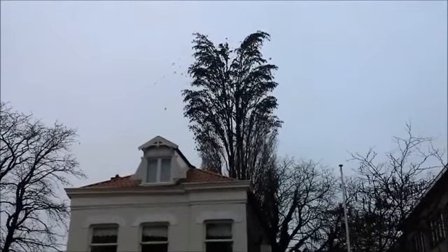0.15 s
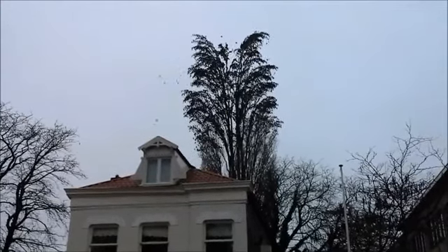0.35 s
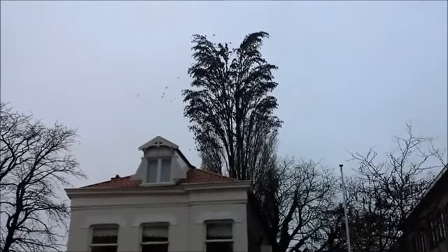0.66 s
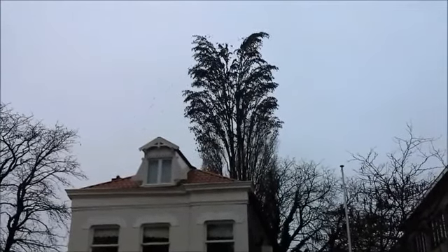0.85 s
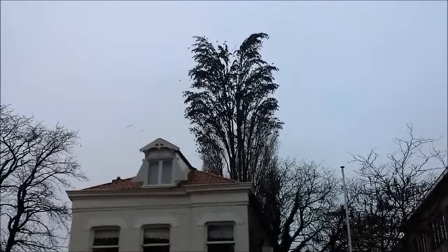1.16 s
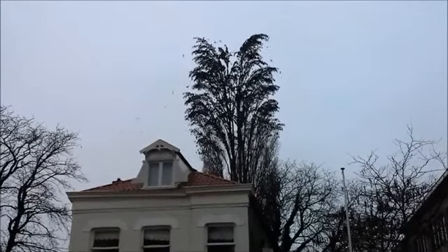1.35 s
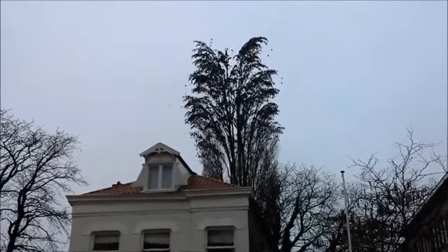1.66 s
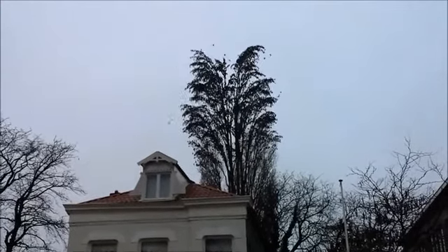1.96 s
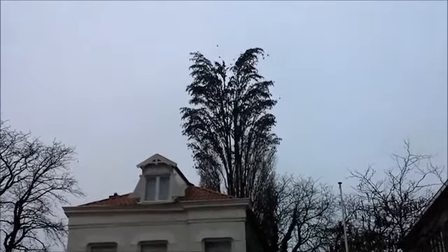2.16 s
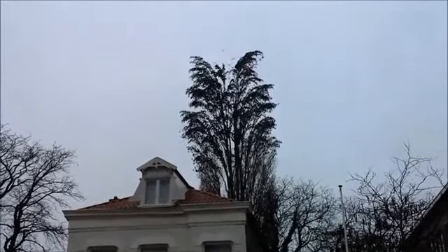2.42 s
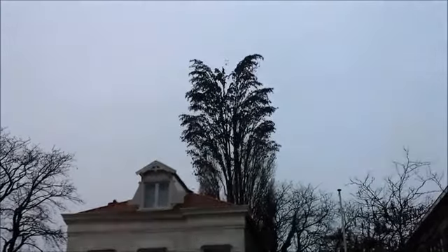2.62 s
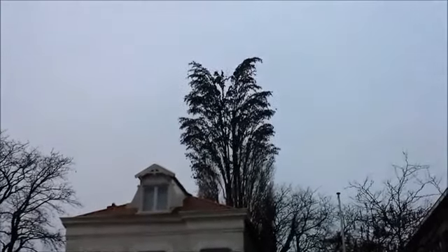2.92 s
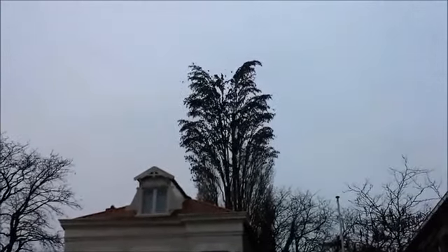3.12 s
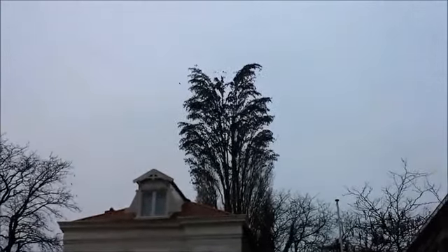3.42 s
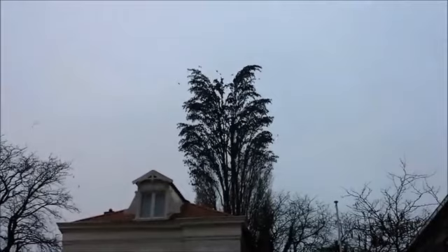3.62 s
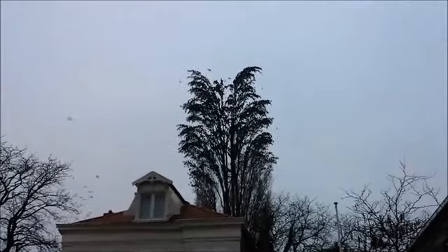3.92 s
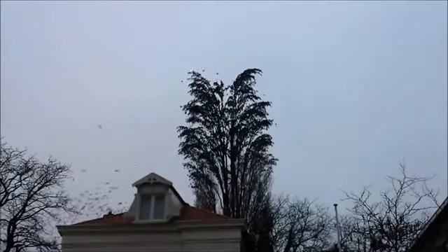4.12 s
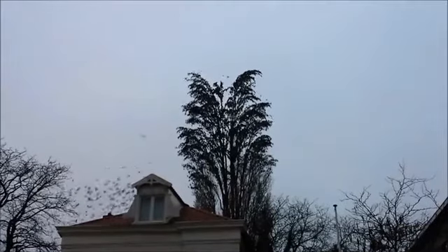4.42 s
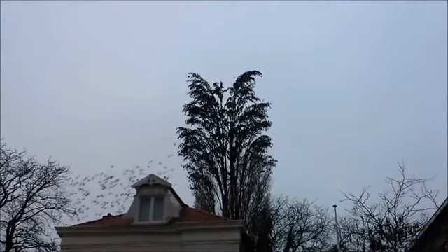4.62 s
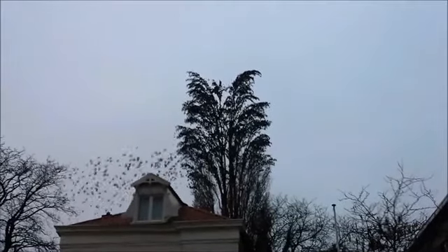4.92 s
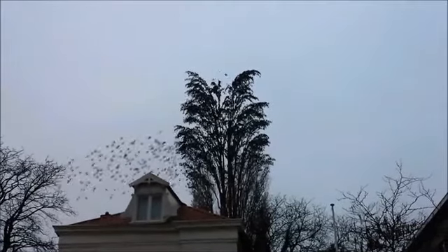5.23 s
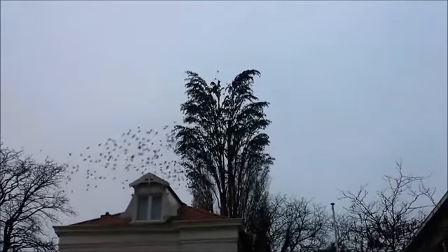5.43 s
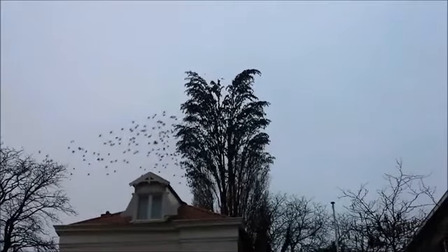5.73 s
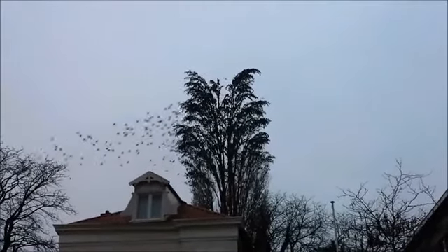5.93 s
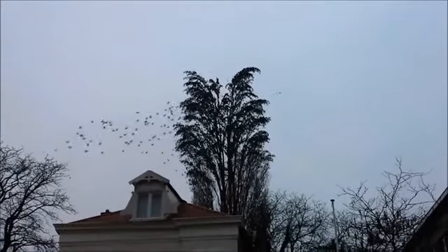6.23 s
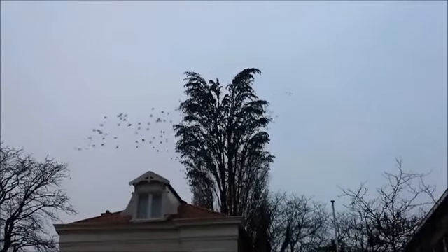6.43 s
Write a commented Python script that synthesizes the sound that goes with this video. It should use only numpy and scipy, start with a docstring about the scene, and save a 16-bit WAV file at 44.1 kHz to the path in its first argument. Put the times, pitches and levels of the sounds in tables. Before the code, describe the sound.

A huge flock of starlings squeaks and chatters shrilly in a tall tree, with a few nearer whistles over faint town rumble.

```python
"""A shrill wash of starlings, swelling and sinking: a huge roost in a tall tree, heard from the street.
Squeaks and warbles are gliding near-sines from the syrinx; rasps are uneven pulses ringing the throat.
A few nearer birds cut through with whistles and squeals, and branches and walls scatter the calls.
Behind them sit the hiss of birds deep in the trees, town rumble with drifting engine notes,
one far vehicle going by and a single dull knock."""
import sys
import numpy as np
from scipy import signal
from scipy.fft import rfft, irfft, next_fast_len
from scipy.io import wavfile

SR = 44100
rng = np.random.default_rng(int(sys.argv[2]) if len(sys.argv) > 2 else 0)


def unload_audio(sound):
    """Save the sound as a 16-bit wav file, at the path given as the first command line argument."""
    columns = np.transpose(np.atleast_2d(sound))
    # keep every value between -1 and 1, then stretch to whole-number steps
    steps = np.round(np.clip(columns, -1, 1) * 32767)
    wavfile.write(sys.argv[1], SR, steps.astype(np.int16))


N = 289737
T = np.arange(N) / SR


def flock():
    """The crowd in the tree: hundreds of overlapping calls fuse into shrill, harsh and low layers."""
    rise_db = flurries()
    shrill_gain, harsh_gain = undb(-29 + rise_db), undb(-33 + 0.19 * rise_db)
    squeaks = level(chorus(squeak, hz=6900, spread=0.052, length_s=0.06, count=500), -1.7)
    sizzle = level(chorus(buzz, hz=7020, spread=0.07, length_s=0.1, count=120), -7)
    pipes = level(chorus(pipe, hz=8450, spread=0.035, length_s=0.08, count=120), -40.5)
    rasps = level(chorus(buzz, hz=5220, spread=0.098, length_s=0.09, count=150), -5)
    chirps = level(chorus(warble, hz=5100, spread=0.085, length_s=0.03, count=340), -3)
    warbles = level(chorus(warble, hz=2280, spread=0.085, length_s=0.05, count=360), -43)
    chatter = level(chorus(buzz, hz=2890, spread=0.18, length_s=0.1, count=130), -44)
    shrill = scatter((squeaks + sizzle) * shrill_gain + pipes, wet_db=3.5, t60_s=0.23)
    harsh = scatter((rasps + chirps) * harsh_gain, wet_db=1, t60_s=0.16)
    low = scatter(warbles + chatter, wet_db=1, t60_s=0.5)
    return shrill + harsh + low


def flurries(attack_s=0.1, release_s=0.17):
    """Level ride in dB as squeaking spreads through the crowd: birds join in, keep on, drop out."""
    # surges of excitement: start_s, length_s, rise_db
    surges = [ (0.14, 0.44, 4.5), (0.73, 0.61, 5), (2.258, 0.4, 5), (2.82, 0.6, 6.5), (3.463, 0.61, 5),
              (4.08, 0.5, 5), (4.658, 0.53, 3.5), (5.237, 0.37, 5.5), (5.85, 0.61, 2.5)]
    rise_db = np.zeros(N)
    for start, length, db in surges:
        ramp = np.minimum((T - start) / attack_s, (start + length - T) / release_s)
        rise_db += db * np.clip(ramp, 0, 1)
    return rise_db


def chorus(voice, hz, spread, length_s, count, distance_db=0.53):
    """Many birds call at random moments, each with its own pitch, distance and perch."""
    out = np.zeros((2, N))
    starts = (np.arange(count) + rng.random(count)) / count * (T[-1] + length_s) - length_s
    # traits have a spread of 1 and no outliers, so no bird leaps out of the crowd
    traits = np.sqrt(6) * rng.triangular(-1, 0, 1, (count, 7))
    for start, (pitch, span, loud, perch, *style) in zip(starts, traits):
        call = voice(length_s * np.exp(0.25 * span), hz * np.exp(spread * pitch), np.array(style))
        add(out, start, call * undb(distance_db * loud), pan=0.27 * perch)
    return out


def squeak(length_s, hz, style, glide=0.05, rough=0.291):
    """A short whistle whose bend and hoarseness vary from bird to bird."""
    return whistle(length_s, hz * np.exp(glide * style), rough * np.exp(0.782 * style[0]))


def pipe(length_s, hz, style, glide=0.025):
    """A thin whistle that bends only a little."""
    return whistle(length_s, hz * np.exp(glide * style), rough=0.16)


def warble(length_s, hz, style, glide=0.07):
    """A hoarse, throaty twitter."""
    return whistle(length_s, hz * np.exp(glide * style), rough=0.867)


def buzz(length_s, hz, style, typical_pulse_hz=190):
    """A rasp whose pulse rate varies from bird to bird."""
    return rasp(length_s, hz, typical_pulse_hz * np.exp(0.5 * style[0]))


def whistle(length_s, pitches_hz, rough, flutter_db=3):
    """A near-sine from the syrinx glides through three pitches; fast pitch shake makes it squeal."""
    t = np.arange(int(length_s * SR)) / SR
    progress = t / length_s
    first, middle, last = pitches_hz
    bow = (2 * middle - first - last) * 2 * progress * (1 - progress)
    glide_hz = first + (last - first) * progress + bow
    quaver = 0.00797 * wander(t, 70.26)
    shake = min(rough, 1) * 0.0596 * wander(t, 480)
    phase = np.float32(2 * np.pi / SR * np.cumsum(glide_hz * (1 + quaver + shake)))
    flutter = undb(flutter_db * wander(t, 132))
    return np.sqrt(2) * np.sin(phase) * swell(progress, 0.11) * flutter


def rasp(length_s, throat_hz, pulse_hz, ring_s=0.00029):
    """A buzzy rattle: uneven pulses, each ringing the throat for an instant."""
    t = np.arange(int(length_s * SR)) / SR
    cycles = np.cumsum(np.exp(0.25 * wander(t, 150))) * pulse_hz / SR
    pulse_age = (cycles - np.floor(cycles)) / pulse_hz
    ring_hz = throat_hz * (1 + 0.063 * wander(t, 91))
    phase = np.float32(2 * np.pi * ring_hz * pulse_age)
    pulse_envelope = pulse_age / ring_s * np.exp(-pulse_age / ring_s)
    return np.sin(phase) * pulse_envelope * swell(t / length_s, 0.14)


def solo_birds(arch=0.015):
    """Single birds stand out from the crowd; twigs close by smear each call briefly."""
    # near whistles and squeals: start_s, length_s, first_hz, last_hz, level_db, roughness (0-1)
    whistles = [ (.235, .11, 6550, 6430, -29.5, 0.1), (0.313, 0.063, 6980, 5430, -29.5, 0.3),
                (0.692, .2, 6610, 6120, -31, .6), (0.932, 0.15, 6840, 8420, -30.5, .5),
                (1.065, .21, 8440, 6410, -32, 0.5), (1.20, .14, 7860, 8720, -42, .05),
                (1.554, .086, 7450, 7730, -35, .2), (1.711, .13, 6860, 6900, -23, 1),
                (1.818, 0.1, 7740, 6000, -34, .3), (2.027, .062, 6910, 8100, -29.5, .22),
                (2.126, .21, 9160, 8640, -39, 0.2), (2.39, .2, 5890, 6250, -32, 0.2),
                (2.651, .14, 6580, 7840, -29.5, .4), (2.918, 0.14, 7660, 8800, -32.5, .3),
                (3.01, .13, 6920, 7400, -24.5, .4), (3.09, .09, 7780, 6640, -28, 0.22),
                (3.224, 0.026, 6850, 6570, -27.5, .5), (3.518, .14, 6890, 7260, -25, .3),
                (3.679, .1, 7210, 7060, -28, .3), (3.75, .06, 8400, 7250, -31.5, 0.1),
                (3.798, .19, 6900, 6610, -28.5, .1), (3.869, .085, 7200, 7930, -27, .12),
                (3.954, .085, 8160, 6370, -23, .06), (4.056, .14, 7780, 7800, -30.5, 0.3),
                (4.187, .14, 6340, 6990, -27.5, 0.09), (4.498, .15, 8300, 6090, -31, .05),
                (4.667, .13, 8900, 8320, -36, 0.51), (4.693, .089, 6730, 8070, -33, .2),
                (4.768, .08, 8100, 6680, -28.5, .12), (4.83, 0.22, 7630, 7840, -33.5, .2),
                (4.848, .12, 6050, 6470, -35, .15), (5.27, 0.045, 6450, 7600, -25, 0.7),
                (5.309, .15, 6850, 7270, -32.5, .4), (5.391, 0.137, 8100, 8400, -37, .15),
                (5.473, .09, 7340, 6950, -29.5, .4), (5.801, .08, 6430, 6820, -26, 0.44),
                (6.015, .19, 7880, 7300, -32, .05), (6.19, .17, 7420, 6570, -28, .06)]
    # faint lower calls from farther off: start_s, length_s, pitch_hz, level_db, roughness (0-1)
    low_calls = [ (1.13, 0.063, 1820, -43, 0.3), (1.27, .18, 2900, -44, 0.54), (1.352, 0.2, 630, -49, 0.9),
                 (6.482, 0.073, 963, -47, .5)]
    # near rasps: start_s, length_s, throat_hz, level_db
    rasps = [ (.345, .08, 4900, -37.5), (1.17, 0.13, 4800, -34.5), (2.651, .14, 5600, -31.5),
             (2.93, .08, 5950, -35), (3.468, .12, 5570, -32.5), (3.72, 0.11, 5030, -32),
             (4.265, .14, 5440, -38), (5.553, 0.19, 5270, -33), (5.962, 0.12, 5800, -32),
             (6.47, 0.074, 5450, -36)]
    out = np.zeros((2, N))
    for start, length, first, last, db, rough in whistles:
        middle = (first + last) / 2 * (1 + arch)  # every glide bows upward
        add(out, start, undb(db) * whistle(length, (first, middle, last), rough), pan=0.058)
    for start, length, hz, db, rough in low_calls:
        add(out, start, undb(db) * whistle(length, (hz, hz, hz), rough))
    for start, length, hz, db in rasps:
        add(out, start, level(rasp(length, hz, pulse_hz=300, ring_s=0.00044), db))
    return scatter(out, wet_db=-1.5, t60_s=0.12)


def scatter(x, wet_db, t60_s):
    """Branches and house fronts return a dense tail, different at each ear."""
    t = np.arange(SR // 2) / SR
    tail = rng.standard_normal((2, len(t))) * np.exp(-np.log(1000) * t / t60_s)
    tail /= np.sqrt(np.sum(tail ** 2, axis=1, keepdims=True))
    reflections = signal.fftconvolve(x, tail, axes=1)[:, :N]
    wet = undb(wet_db)
    return (x + wet * reflections) / np.sqrt(1 + wet ** 2)


def far_flock():
    """Birds deep in the trees blur into a wide, soft hiss."""
    # spectrum of the blurred calls: frequency_hz, gain_db
    hiss_curve = [(710, -46.5), (1200, -35.5), (1700, -13.5), (2260, -9.5), (3530, -12), (4620, -7.5),
                  (5790, -6), (6600, -2.5), (7070, -2.5), (7580, -2.5), (8790, -17), (9100, -16),
                  (9590, -40.5), (12500, -67.5), (21100, -120)]
    mid, side = colour(rng.standard_normal((2, N)), hiss_curve)
    flicker = undb(0.32 * wander(T, 9))
    return level(stereo(mid, undb(-3) * side), -28.5) * flicker


def traffic(climb_per_s=0.0397):
    """A bed of town rumble, narrow in the bass, with wavering engine notes drifting in and out."""
    # spectrum of the rumble: frequency_hz, gain_db
    rumble_curve = [(13, -35.5), (22, -11.5), (97, -0.5), (129, -4), (162, -3.5), (290, -6), (372, -12),
                    (451, -13.5), (677, -14.5), (1150, -18), (1500, -16.5), (1950, -45), (3300, -120)]
    # stereo width of the rumble: frequency_hz, side_minus_mid_db
    width_curve = [(30, -8), (130, -11.5), (250, -10.5), (500, -4.5), (1000, 2.5)]
    # distant engines: start_s, length_s, first_hz, level_db
    engine_notes = [ (.05, 1.13, 95.2, -46), (.5, 1.14, 242, -49.5), (1.55, 0.58, 157, -48.5),
                    (1.7, 0.65, 209, -48.5), (2.353, .47, 89.5, -46.5), (2.75, 1.1, 164.7, -48),
                    (2.95, 0.32, 200, -46), (3.15, 1.45, 105.6, -44.5), (4.2, 0.7, 162, -46),
                    (4.35, .58, 74.6, -46.5), (4.55, 1.15, 39.9, -49.5), (4.95, 0.83, 162, -50.5)]
    mid, side = colour(rng.standard_normal((2, N)), rumble_curve)
    rumble = level(stereo(mid, colour(side, width_curve)), -38)
    out = rumble * undb(0.56 * wander(T, 4.1))
    for start, length, first_hz, db in engine_notes:
        t = np.arange(int(length * SR)) / SR
        climb = 1 + climb_per_s * t  # each engine speeds up gently
        hz = first_hz * climb * (1 + 0.0074 * wander(t, 30))
        note = np.sqrt(2) * np.sin(2 * np.pi * np.cumsum(hz) / SR)
        add(out, start, note * swell(t / length, 0.18) * undb(db + 2.5 * wander(t, 14.6)))
    return out


def passing_vehicle(nearest_s=4.2, linger_s=1.4, nearest_db=-47.5):
    """Dull road roar swells and fades as a vehicle goes by behind the houses."""
    # spectrum of tyres on the road: frequency_hz, gain_db
    tyre_curve = [(120, -24), (200, -9.5), (320, 0.5), (480, -6), (900, -7.5), (1600, -30)]
    mid, side = colour(rng.standard_normal((2, N)), tyre_curve)
    nearness = 1 / (1 + ((T - nearest_s) / linger_s) ** 2)
    return level(stereo(mid, undb(-5.5) * side), nearest_db) * nearness


def knock(start_s=4.67, attack_s=0.0086, t60_s=0.2):
    """One soft, distant knock, blurred by the street into a dull burst of noise."""
    # body of the knock: frequency_hz, gain_db
    body_curve = [(300, -32), (480, 3), (640, 0), (1000, -27)]
    age = np.maximum(T - start_s, 0)
    envelope = np.minimum(age / attack_s, 1) * np.exp(-np.log(1000) * age / t60_s)
    return level(colour(rng.standard_normal(N), body_curve), -37) * envelope


def undb(db):
    """Decibels to gain."""
    return np.exp(np.asarray(db) * (np.log(10) / 20))


def level(x, db):
    """Scale to an rms level."""
    return x * undb(db) / np.sqrt(np.mean(x ** 2))


def colour(x, curve):
    """Equalise along a curve of (frequency_hz, gain_db) points."""
    hz, db = np.transpose(curve)
    size = next_fast_len(N + 4096)
    bin_hz = np.maximum(np.arange(size // 2 + 1) * SR / size, 1)
    gain = undb(np.interp(np.log(bin_hz), np.log(hz), db))
    return irfft(rfft(x, size) * gain, size)[..., :N]


def wander(t, rate_hz):
    """Random modulation: rate_hz values a second, joined by straight lines."""
    knots = rng.standard_normal(size=256)
    return np.interp(t * rate_hz, np.arange(len(knots)), knots)


def swell(progress, edge):
    """Rounded fade in and out over progress 0..1; each fade takes the share edge."""
    ramp = np.minimum(np.minimum(progress, 1 - progress) / edge, 1)
    return ramp * (2 - ramp)


def stereo(mid, side):
    """Mid and side to left and right."""
    return mid + np.outer([1, -1], side)


def add(out, start_s, sound, pan=0):
    """Mix a sound into the two channels; pan runs from -1 (right) to 1 (left)."""
    onset = int(np.clip(start_s * SR, -len(sound), N))
    part = sound[max(-onset, 0):N - onset]
    first = max(onset, 0)
    out[:, first:first + len(part)] += np.outer([1 + pan, 1 - pan], part)


def scene():
    """Starlings in front, the town behind."""
    return flock() + solo_birds() + far_flock() + traffic() + passing_vehicle() + knock()


def record(dry, top_hz=9550):
    """The right microphone is brighter than the left; the top is dulled, then cut steeply."""
    # balance between the microphones: frequency_hz, left_minus_right_db
    balance_curve = [(100, -0.8), (500, -1.6), (2000, 0), (4500, -1), (6300, 1), (7300, -5.5), (8600, -5),
                     (9500, -8)]
    # treble lost to distance and microphone: frequency_hz, gain_db
    treble_curve = [(7600, 0.5), (8600, -1), (9000, -3.5), (9600, -11)]
    left = colour(dry[0], [(hz, db / 2) for hz, db in balance_curve])
    right = colour(dry[1], [(hz, -db / 2) for hz, db in balance_curve])
    dulled = colour(np.array([left, right]), treble_curve)
    high_cut = signal.ellip(10, 0.2, 80, top_hz, fs=SR, output="sos")
    return signal.sosfilt(high_cut, dulled)


dry = scene()
out = record(dry)
unload_audio(out)
```